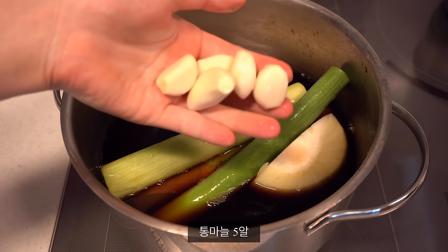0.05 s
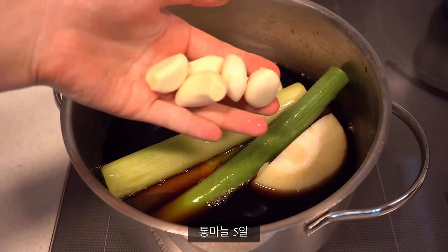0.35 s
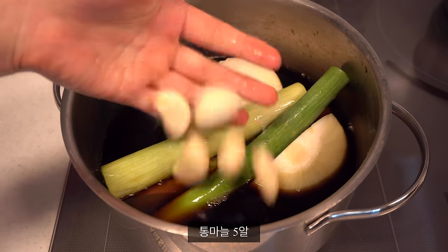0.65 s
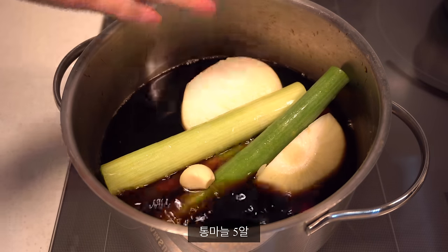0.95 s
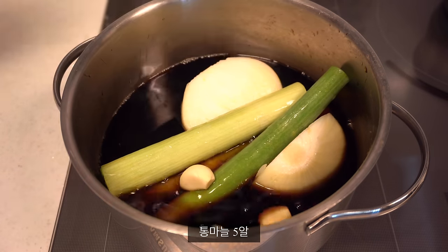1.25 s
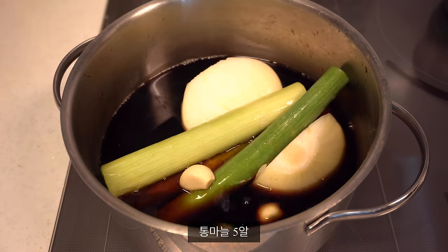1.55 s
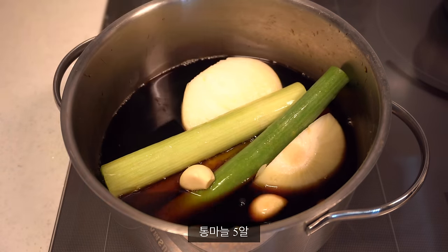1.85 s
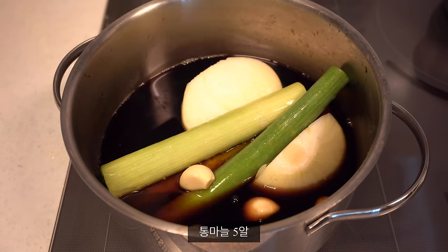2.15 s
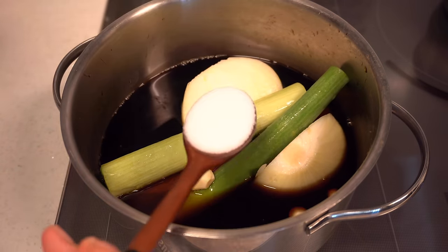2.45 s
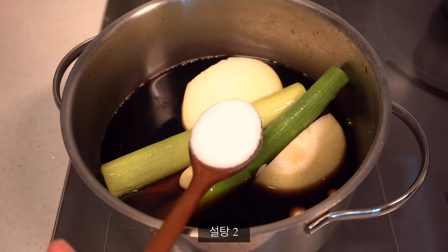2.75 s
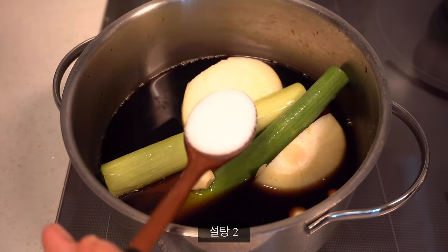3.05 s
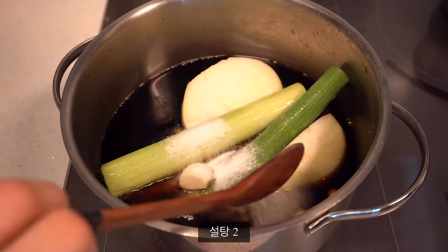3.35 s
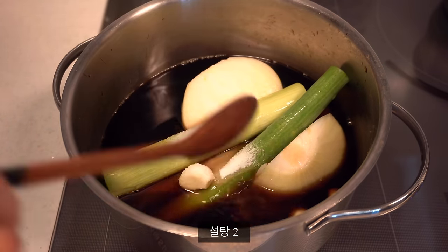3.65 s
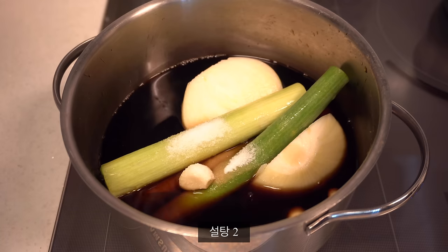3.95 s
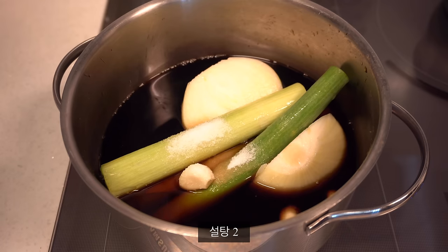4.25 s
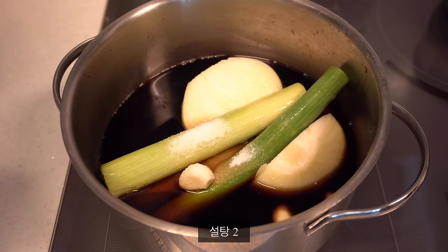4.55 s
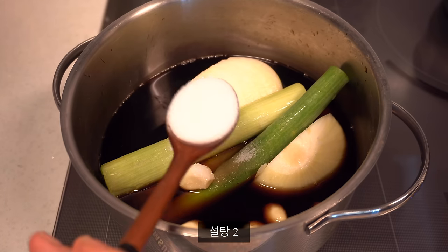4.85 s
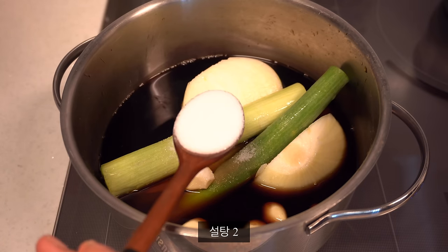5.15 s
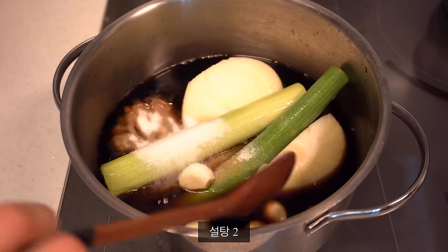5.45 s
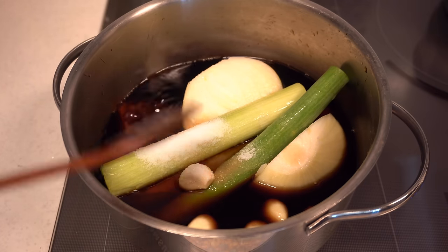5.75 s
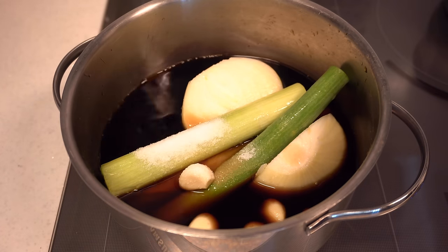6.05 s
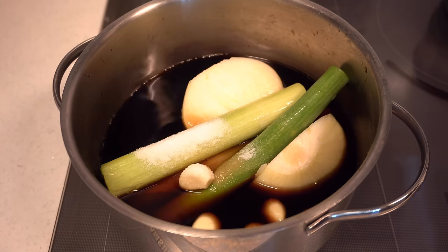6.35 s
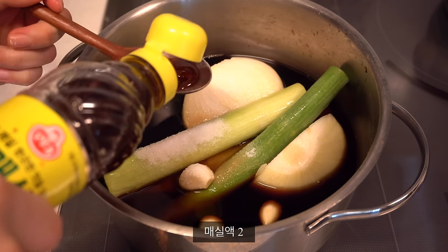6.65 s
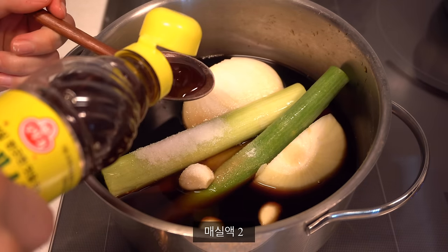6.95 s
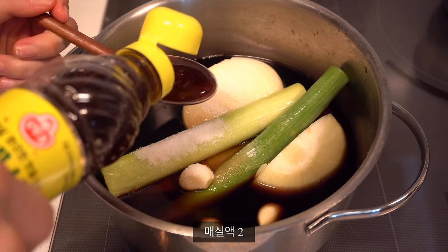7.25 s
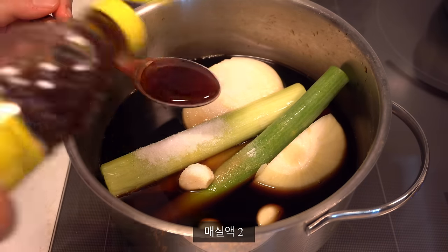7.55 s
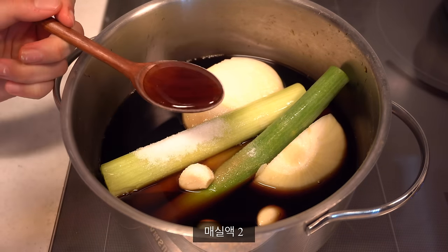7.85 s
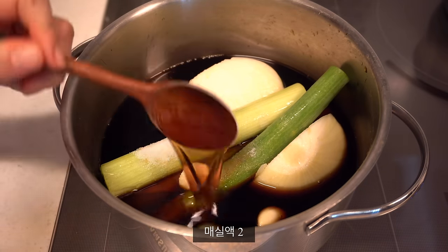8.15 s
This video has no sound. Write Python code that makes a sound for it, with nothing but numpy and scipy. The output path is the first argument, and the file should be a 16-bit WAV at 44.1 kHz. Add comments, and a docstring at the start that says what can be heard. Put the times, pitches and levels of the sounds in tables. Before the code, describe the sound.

Close to a steel pot, a quick cluster of plops and soft thuds sounds as garlic drops into broth. A quiet hob buzz and fan join the kitchen hum. Two faint hisses of sugar are separated by a gritty scoop, followed by knocks of a jar being set down. Then come sharp crackles and a gulp from a plastic bottle, one wooden tap on the rim and a small drip.

```python
"""Seasoning a pot of soy broth

In a small kitchen, garlic cloves plop into a steel pot with a thud, a slap and ringing bubbles.
The induction hob starts to buzz, two spoons of sugar hiss in and a jar knocks on the counter.
A plastic syrup bottle crackles as its wall buckles and gulps air back through its neck.
The wooden spoon taps the rim and syrup drips into the broth, over a low appliance hum."""
import sys
import numpy as np
from scipy import signal
from scipy.fft import rfft, irfft, next_fast_len
from scipy.io import wavfile

SR = 44100
rng = np.random.default_rng(int(sys.argv[2]) if len(sys.argv) > 2 else 0)


def file_out(sig):
    """Save sig as 16-bit WAV at sys.argv[1]."""
    # one column per channel
    cols = np.atleast_2d(sig).T
    # limit, then scale
    lim = np.clip(cols, -1, 1)
    pcm = np.round(lim * 32767).astype(np.int16)
    wavfile.write(sys.argv[1], SR, pcm)


N = 366471
TIME = np.arange(N) / SR


# Slaps on the surface. Each row: start in seconds, strength in dB, centre in Hz.
SLAPS = [(.7200, -1, 1110), (.747, -14, 2200), (.7701, -10.5, 13000), (.7860, -3, 1600), (.7900, -4, 4800),
         (.8336, -8.5, 4500), (.8373, -7.5, 2150), (.876, -23.5, 3500), (3.589, -25.5, 3500),
         (8.2555, -14, 4030)]
# Tiny droplets falling back. Each row: start in seconds, strength in dB.
DROPLETS = [(1.129, -38.5), (1.185, -36), (1.344, -40), (8.186, -38), (8.261, -26)]
# Soft thuds of cloves landing and the bottle springing back. Each row: start in seconds, strength in dB.
THUDS = [(0.723, 9), (0.76, 2), (0.787, -3), (.830, -2), (0.876, 1.5), (7.395, 2), (7.447, 1.5)]
# Hollow ring of the air in the pot. Each row: pitch in Hz, width in Hz, gain in dB.
POT_AIR = [(580, 54, -6), (713, 10, -11), (791, 12, -6)]

def broth(smear_s=.0006, droplet_hz=8900, slap_octaves=1.11):
    """What falls in thuds, slaps the surface and traps bubbles; the air in the pot rings along."""
    splash = band(bubbles(), 450, SR / 2)  # the bubbles are kept clear of bass below about 450 Hz
    reach = 2 ** slap_octaves
    for s, db, hz in list(SLAPS) + [(s, db, droplet_hz) for s, db in DROPLETS]:
        add(splash, s, from_db(db) * band(contact(smear_s), hz / reach, hz * reach))
    for s, db in THUDS:
        add(splash, s, from_db(db) * band(contact(smear_s), 35, 193, order=4))
    return splash + resonate(splash, POT_AIR)


# The big plops. Each row: start in seconds, starting pitch in Hz, level in dB.
BIG_BUBBLES = [(.7200, 1150, -26), (.7226, 583, -18), (.7578, 675, -21), (.7645, 2360, -27.5),
               (.7732, 660, -19.5), (.782, 4280, -32), (.7843, 554, -26), (.7850, 3820, -28),
               (.8008, 4900, -40), (.8132, 1340, -27.5), (.8217, 4900, -30.5), (.8728, 678, -25),
               (.8925, 620, -27), (1.048, 3000, -49), (1.066, 3340, -49.5), (1.148, 5170, -59.5),
               (3.339, 770, -41), (3.5888, 2920, -43.5), (8.2568, 1315, -32)]
# Small bubbles in the splash and slosh. Each row: middle and spread in seconds, level in dB, centre in Hz.
SWARMS = [(.790, 0.011, -44, 3800), (.86, .04, -32.5, 656)]

def bubbles(fizz_spread_s=.0054, fizz_db=2.5, fizz_hz=3100):
    """Trapped air rings as single plops, as swarms and as the fizz that sinking sugar drags under."""
    fizz = [(s, fizz_spread_s, db + fizz_db, fizz_hz) for s, db in SUGAR_SINKS]
    small = [row for cloud in list(SWARMS) + fizz for row in swarm(*cloud)]
    track = np.zeros(N)
    for s, hz, db in list(BIG_BUBBLES) + small:
        add(track, s, bubble(hz, db))
    return track


def bubble(hz, db, glide=.38, onset_cycles=.39):
    """A damped tone whose pitch climbs as the bubble rises."""
    t = TIME[:SR // 10]
    t60 = .018 * (1000 / hz) ** .13  # higher bubbles die sooner
    pitch = hz * (1 + glide * np.minimum(t / t60, 1))
    attack = 1 - np.exp(-t * hz / onset_cycles)
    return np.sqrt(2) * np.sin(2 * np.pi * np.cumsum(pitch) / SR) * attack * from_db(db - 60 * t / t60)


def swarm(s, spread_s, db, centre_hz, count=10, octaves=.58):
    """Start, pitch and level for small bubbles scattered around a moment and a pitch."""
    return [(s + 2 * spread_s * (2 * when - 1), centre_hz * 2 ** (octaves * (pitch - .5)), db - 10 * weak)
            for when, pitch, weak in rng.uniform(size=(count, 3))]


# Sugar sliding off the spoon. Each row: crest in seconds, half length in seconds, level in dB.
SUGAR_POURS = [(3.245, 0.028, -56), (3.309, .009, -53), (3.43, .13, -72.5), (5.365, 0.016, -50.5)]
# Heaps going under. Each row: crest in seconds, level in dB.
SUGAR_SINKS = [(3.307, -52.5), (3.341, -54), (5.432, -52.5)]
SUGAR_HISS_HZ = (3970, 14000)

def sugar():
    """Sugar slides off the spoon with a bright hiss and sinks with a duller one."""
    pouring = sum(swell(*pour) for pour in SUGAR_POURS)
    sinking = sum(swell(s, .012, db) for s, db in SUGAR_SINKS)
    bright = pouring * crystals(*SUGAR_HISS_HZ, grains_per_s=14000)
    dull = sinking * crystals(2100, 9000, grains_per_s=14000)
    return bright + dull


# The spoon's push through the sugar jar. Each row: time in seconds, strength in dB.
SCOOP_PUSH = [(4.042, -93), (4.056, -54.5), (4.14, -64.5), (4.203, -66.5), (4.213, -54), (4.285, -50.5),
              (4.33, -66)]
# Lumps giving way. Each row: crest in seconds, strength in dB.
LUMPS = [(4.157, -41.5), (4.2113, -40), (4.271, -49), (4.277, -40.5), (4.307, -50)]
# Woody colour of the spoon. Each row: pitch in Hz, width in Hz, gain in dB.
SPOON_MODES = [(1240, 150, 1), (2110, 190, -4), (3800, 280, -0.5), (4500, 98, -1)]

def scoop(rasp_db=-2, hiss_db=-3):
    """The spoon digs in and breaks lumps; grains rasp against its bowl and loose ones hiss."""
    push = from_db(np.interp(TIME, *np.transpose(SCOOP_PUSH), left=-200, right=-200))
    crunch = sum(swell(s, .0027, db) for s, db in LUMPS)
    rasp = push * crystals(880, 4500, grains_per_s=2600, order=2)
    rasp += crunch * crystals(1000, 2700, grains_per_s=6000, order=2)
    hiss = push * crystals(*SUGAR_HISS_HZ, grains_per_s=9000)
    return from_db(rasp_db) * rasp + resonate(rasp, SPOON_MODES) + from_db(hiss_db) * hiss


def crystals(low_hz, high_hz, grains_per_s, order=1):
    """Sugar crystals ticking at random, at an rms of 1."""
    ticks = rng.standard_normal(N) * (rng.random(N) < grains_per_s / SR)
    grains = band(ticks, low_hz, high_hz, order)
    return grains / grains.std()


# Crackles of the syrup bottle. Each row: start in seconds, strength in dB, high cut in Hz.
CRACKLES = [(6.432, -27.5, 11000), (6.4724, -13.5, 15500), (6.6162, -27.5, 15000), (6.7156, -19, 4900),
            (6.828, -23, 12000), (6.842, -25, 12000), (6.8660, 3, 12000), (7.1673, -19.5, 13200),
            (7.2307, -22, 15800), (7.3235, -25, 13000), (7.3954, -6, 4270), (7.416, -18.5, 7040),
            (7.5761, -14.5, 16000)]
# Plastic colour of its wall. Each row: pitch in Hz, width in Hz, gain in dB.
BOTTLE_MODES = [(340, 430, 0.5), (822, 140, 12), (1090, 210, 6.5), (1560, 810, 10.5), (2190, 420, 7),
                (2840, 530, 0), (3450, 170, 7), (3710, 140, 4), (4840, 260, 0), (6830, 250, -31),
                (12000, 3500, -6)]

def bottle_crackles():
    """The wall buckles; a harder snap moves a larger panel, reaches deeper and fills the room more."""
    snaps = []
    for s, db, high_hz in CRACKLES:
        energy = from_db(db) ** 2
        octaves = 1.93 + 2.3 * energy
        send_db = -8 + 3 * energy
        snaps.append((s, db, high_hz / 2 ** octaves, high_hz, send_db))
    return blows(snaps, BOTTLE_MODES, smear_s=.0005)


# Gulps. Each row: start in seconds, strength in dB, low cut and high cut in Hz, room send in dB.
GULPS = [(7.3956, 3.5, 650, 14800, -9), (7.4742, 1, 404, 1800, -16), (7.4790, -3, 450, 1400, -4)]
# Throaty colour of the bottle neck. Each row: pitch in Hz, width in Hz, gain in dB.
NECK_MODES = [(580, 200, 3.5), (770, 93, 14), (1020, 400, 2.5), (1470, 410, 3.5), (1870, 220, 9.5),
              (2500, 230, -2), (4100, 260, -6), (5600, 1700, -15), (9660, 1200, -1), (12700, 3000, -29)]

def bottle_gulps():
    """Air gulps back through the wet neck and sets it ringing."""
    return blows(GULPS, NECK_MODES, smear_s=.0009)


# Jar knocks. Each row: start in seconds, strength in dB, low cut and high cut in Hz, room send in dB.
KNOCKS = [(5.5550, 0, 90, 2500, -2.5), (5.7272, -9, 70, 2240, -1.5), (5.7310, -5.5, 90, 1040, -3.5)]
# Body of the jar on the counter. Each row: pitch in Hz, width in Hz, gain in dB.
COUNTER_MODES = [(130, 310, 3), (305, 27, 14), (470, 190, 13.5), (660, 290, 13.5), (1030, 146, 13),
                 (1340, 57, 10), (1650, 76, -2), (2000, 83, -24), (3350, 950, 2.5)]

def jar_knocks():
    """The jar lands on the counter with one knock, then a softer double one."""
    return blows(KNOCKS, COUNTER_MODES, smear_s=.0013)


# Spoon taps. Each row: start in seconds, strength in dB, low cut and high cut in Hz, room send in dB.
TAPS = [(7.9001, -2, 306, 9500, -3), (7.9012, 1, 295, 5800, -19)]
# Ring of the pot's rim. Each row: pitch in Hz, width in Hz, gain in dB.
RIM_MODES = [(480, 36, -3.5), (653, 67, 2), (1400, 200, 0.5), (2040, 850, -11), (3000, 710, -9.5),
             (3740, 390, -3.5), (5930, 53, -13.5), (7060, 50, -6), (8360, 70, -11), (9060, 36, -5)]

def spoon_tap():
    """Wood meets the steel rim in two contacts so close that they sound as one tap."""
    return blows(TAPS, RIM_MODES, smear_s=.001)


# Tone colour of the buzz. Each row: frequency in Hz, overtone level in dB before the trim.
COIL_SPECTRUM = [(700, -79.5), (2000, -91), (3100, -103.5), (4400, -108), (5800, -111), (7100, -105),
                 (8000, -103), (10000, -108), (13000, -115)]
# Overtones that meet a resonance of the pot. Each row: pitch in Hz, level in dB before the trim.
COIL_PEAKS = [(1911, -79.5), (2519, -82.5), (2643, -80), (2880, -81), (3483, -86.5), (3844, -83),
              (3962, -78.5), (4081, -81), (4204, -86.5), (4323, -86), (4560, -90.5), (4683, -84),
              (4802, -80.5), (4920, -79), (5044, -84), (5281, -87.5), (5399, -88), (5642, -88.5),
              (5884, -95), (6121, -92), (6605, -90.5), (7682, -97), (7924, -92.5), (9125, -98)]
HOB_ON_S, MAINS_HZ = 2.255, 60.05

def coil_buzz(phase_scatter=.58, level_scatter_db=3.5, trim_db=.4):
    """The induction coil shakes the pot base twice per mains cycle."""
    harmonics = np.arange(6, 110)
    overtones_hz = 2 * MAINS_HZ * harmonics
    levels_db = at_hz(COIL_SPECTRUM, overtones_hz) + level_scatter_db * rng.standard_normal(len(harmonics))
    for hz, db in COIL_PEAKS:
        levels_db[np.argmin(abs(overtones_hz - hz))] = db
    cycle = np.linspace(0, 1, 2048)
    phases = phase_scatter * rng.standard_normal((len(harmonics), 1))
    partials = np.cos(2 * np.pi * np.outer(harmonics, cycle) + phases)
    pulse = np.sqrt(2) * from_db(levels_db + trim_db) @ partials
    return np.interp((TIME - HOB_ON_S) * 2 * MAINS_HZ % 1, cycle, pulse)


# Tones of the running hob. Each row: pitch in Hz, rms level in dB, waver in dB.
HOB_TONES = [(60, -67.5, -0.5), (119.8, -64, 1.5), (145.5, -74.5, -6.5), (599.6, -70, 1), (1290, -77, 5),
             (1395, -77.5, 2)]
# Rush of the cooling fan. Each row: frequency in Hz, density in dB per Hz before the trim.
HOB_FAN = [(100, -96.5), (400, -101), (800, -98), (1400, -99), (2700, -105), (3400, -110), (5000, -113),
           (7500, -123), (15000, -132)]

def hob(onset_s=.0023, fan_trim_db=-.47):
    """Buzz, hum and cooling fan switch on together and then run evenly."""
    switched_on = np.clip((TIME - HOB_ON_S) / onset_s, 0, 1)
    return switched_on * (coil_buzz() + tones(HOB_TONES) + from_db(fan_trim_db) * noise(HOB_FAN))


# A reach past the pot. Each row: time in seconds, gain in dB.
REACH = [(1.1, -32), (1.3, -5.5), (1.58, 0.5), (1.76, -13.5), (1.83, 6), (1.97, -9.5), (2.25, -24)]
# Soft rustle of cloth. Each row: frequency in Hz, density in dB per Hz at unity gain.
SLEEVE_SPECTRUM = [(200, -100), (800, -100), (1800, -104), (4000, -109), (8000, -120), (15000, -126)]

def sleeve():
    """A sleeve and hand rustle as they move by the pot."""
    return gain_curve(REACH) * noise(SLEEVE_SPECTRUM)


# Still air. Each row: frequency in Hz, density in dB per Hz.
ROOM_AIR = [(20, -91.5), (55, -84), (100, -93), (210, -89), (350, -89), (700, -101), (1200, -104),
            (1800, -112), (2800, -117), (5600, -123), (10000, -127), (15000, -128)]
# Appliance hum. Each row: pitch in Hz, rms level in dB, waver in dB.
HUM = [(60, -62.5, 3), (181.3, -64, 2), (212.7, -61.5, 2), (283, -71.5, 2.5)]
# Rise and fall of the low drone. Each row: time in seconds, rms level in dB.
DRONE_SWELL = [(1.7, -68), (1.85, -64), (2.1, -56), (2.24, -56), (2.27, -78)]

def room_tone(drone_hz=60):
    """Still air, humming appliances and a low drone that swells until the hob starts."""
    drone = np.sqrt(2) * gain_curve(DRONE_SWELL) * np.sin(2 * np.pi * drone_hz * TIME)
    return noise(ROOM_AIR) + tones(HUM) + drone


# The kitchen's tail. Each row: frequency in Hz, time to fall 60 dB in seconds.
KITCHEN_DECAY = [(150, 0.99), (500, 0.67), (1500, 0.86), (4000, 0.57), (8000, 0.58), (15000, 0.5)]

def kitchen(send, build_s=.012, wall_hz=4970, early_db=10.5, early_t60=.16):
    """Dense echoes: near surfaces answer first, then the room builds up and dies away band by band."""
    t = TIME[:SR * 3 // 4]
    white = rfft(rng.standard_normal(len(t)))
    centres_hz = np.geomspace(125, 16000, 22)
    bins_hz = np.arange(len(white)) * SR / len(t)
    nearest_band = np.argmin(abs(bins_hz - centres_hz[:, None]), axis=0)
    early = from_db(early_db - 60 * t / early_t60)
    tail = np.zeros(len(t))
    for k, hz in enumerate(centres_hz):
        late = from_db(-60 * t / at_hz(KITCHEN_DECAY, hz)) * (1 - np.exp(-t / build_s))
        envelope = (early + late) / np.linalg.norm(early + late)
        tail += irfft(white * (nearest_band == k), len(t)) * envelope / np.hypot(1, hz / wall_hz)
    predelay = np.zeros(SR // 500)
    return signal.fftconvolve(send, np.concatenate([predelay, tail]))[:N]


def blows(rows, modes, smear_s, crumble=.21):
    """Blows ring one body; returns the direct sound and its room send."""
    direct, send = np.zeros((2, N))
    for s, db, low_hz, high_hz, send_db in rows:
        force = contact(smear_s * from_db(-crumble * db))  # weak blows crumble into several small slips
        sound = from_db(db) * band(resonate(force, modes), low_hz, high_hz, order=5)
        add(direct, s, sound)
        add(send, s, from_db(send_db) * sound)
    return np.array([direct, send])


def contact(smear_s):
    """A unit click, smeared by three short all-pass echoes inside the struck body."""
    force = np.append(1., np.zeros(SR // 4))
    for share in rng.uniform(.15, 1, 3):
        delay = np.zeros(int(share * smear_s * SR))
        loop = np.concatenate([[1], delay, [rng.choice([-.66, .66])]])
        force = signal.lfilter(loop[::-1], loop, force)
    return force


def resonate(x, modes):
    """Parallel resonances, each peaking at its own gain."""
    ring = 0
    for hz, width_hz, db in modes:
        radius = np.exp(-np.pi * width_hz / SR)
        poles = [1, -2 * radius * np.cos(2 * np.pi * hz / SR), radius ** 2]
        ring += from_db(db) * (1 - radius ** 2) / 2 * signal.lfilter([1, 0, -1], poles, x + 1e-18)
    return ring


def tones(rows):
    """Held tones that waver in level."""
    return sum(np.sqrt(2) * from_db(db + waver_db * drift(7)) * np.sin(2 * np.pi * hz * TIME)
               for hz, db, waver_db in rows)


def drift(rate_hz):
    """A slow random wander with a spread near 1."""
    return np.interp(TIME * rate_hz, np.arange(1000), rng.standard_normal(1000))


def noise(spectrum):
    """Steady noise with the given density per Hz."""
    size = next_fast_len(N)
    density = from_db(at_hz(spectrum, np.arange(size // 2 + 1) * SR / size))
    return irfft(rfft(rng.standard_normal(size)) * density, size)[:N] * np.sqrt(SR / 2)


def band(x, low_hz, high_hz, order=2):
    """A second-order low cut, then a high cut of the given order."""
    low_cut = signal.butter(2, np.clip(low_hz, 10, .45 * SR), "high", fs=SR, output="sos")
    high_cut = signal.butter(order, np.clip(high_hz, 10, .45 * SR), fs=SR, output="sos")
    return signal.sosfilt(high_cut, signal.sosfilt(low_cut, x + 1e-18))


def swell(s, half_s, db):
    """A bell-shaped fade in and out."""
    return from_db(db) * np.exp(-np.minimum(abs(TIME - s) / half_s, 10) ** 2)


def gain_curve(rows):
    """A fader ride through points of seconds and dB."""
    return from_db(np.interp(TIME, *np.transpose(rows)))


def at_hz(points, hz):
    """Read a table on a log-frequency axis."""
    known_hz, values = np.transpose(points)
    return np.interp(np.log(np.maximum(hz, 1)), np.log(known_hz), values)


def from_db(db):
    """Decibels to gain."""
    return 10 ** (np.asarray(db) / 20)


def add(track, s, sound):
    """Mix a sound in at a time in seconds."""
    start = max(round(s * SR), 0)
    track[start:start + len(sound)] += sound[:max(N - start, 0)]


def scene(seasoning_send_db=-8):
    """The cooking sounds and their kitchen echo over the hob, room tone and sleeve, in mono."""
    hits, hits_send = jar_knocks() + bottle_crackles() + bottle_gulps() + spoon_tap()
    seasoning = broth() + sugar() + scoop()
    echoes = kitchen(hits_send + from_db(seasoning_send_db) * seasoning)
    return (hits + seasoning + echoes + hob() + room_tone() + sleeve())[None]


def record(dry, ceiling=.31, stop_hz=16800):
    """A soft clip flattens the sharpest peaks and a steep filter cuts the very top."""
    clipped = dry / (1 + (dry / ceiling) ** 8) ** (1 / 8)
    return signal.sosfilt(signal.cheby2(16, 60, stop_hz, fs=SR, output="sos"), clipped)


dry = scene()
out = record(dry)
file_out(out)
```